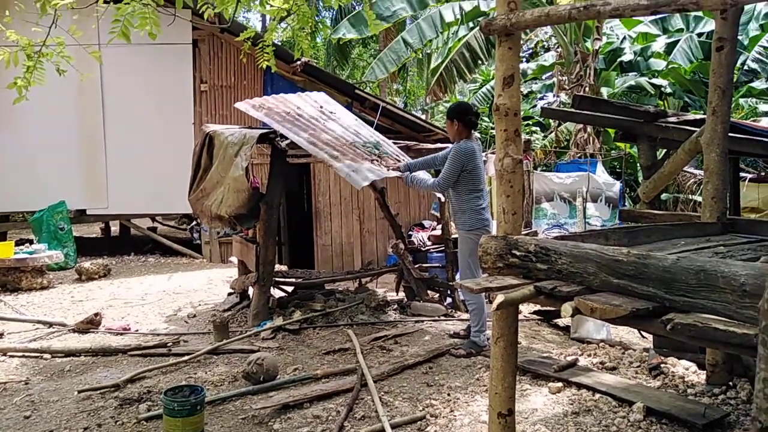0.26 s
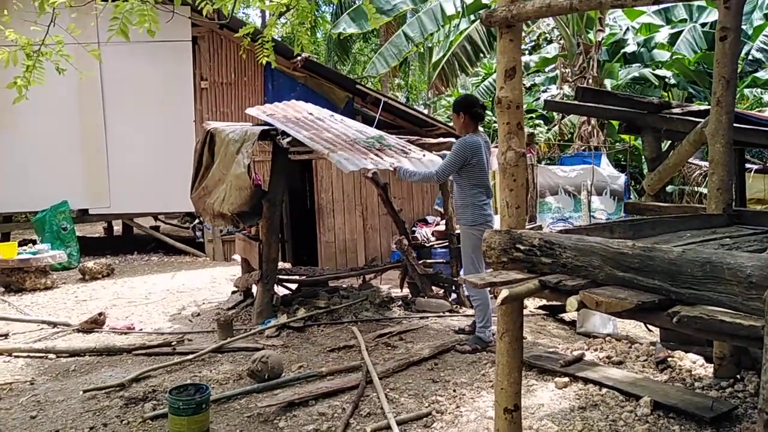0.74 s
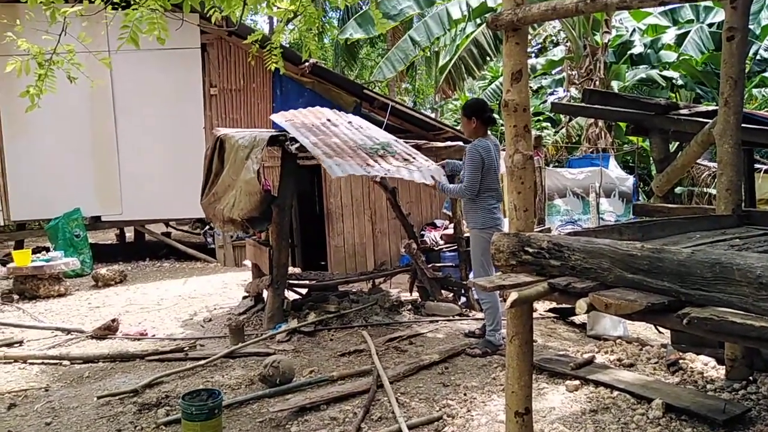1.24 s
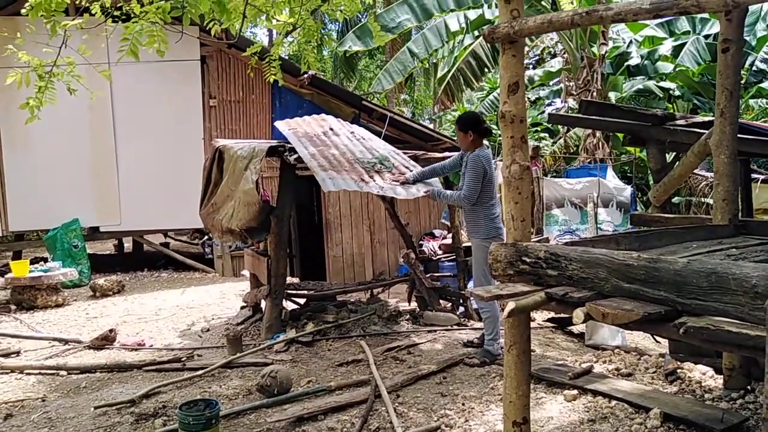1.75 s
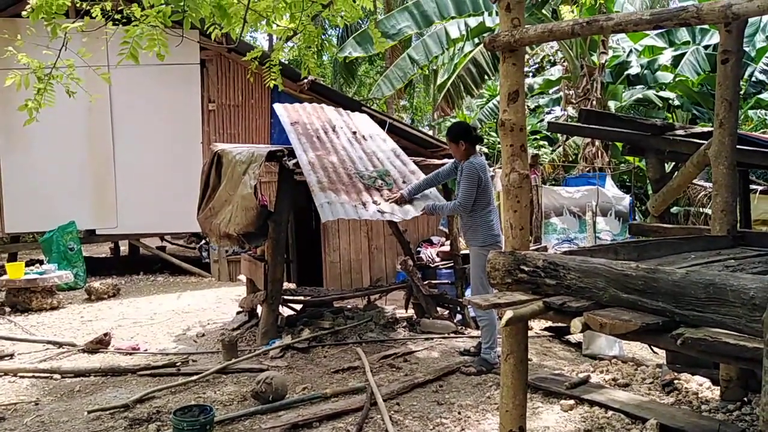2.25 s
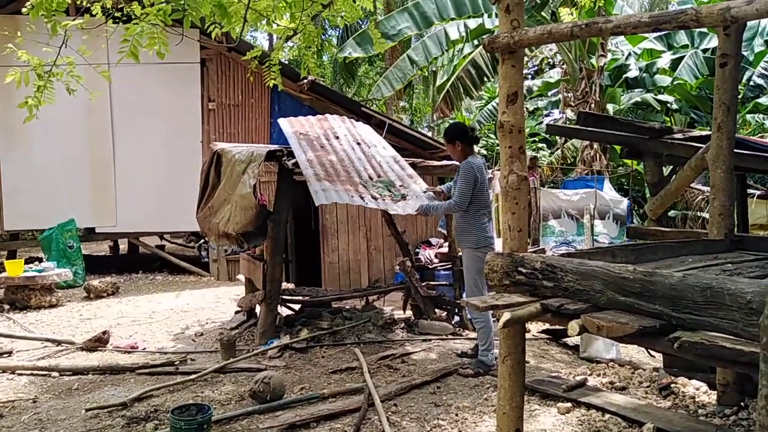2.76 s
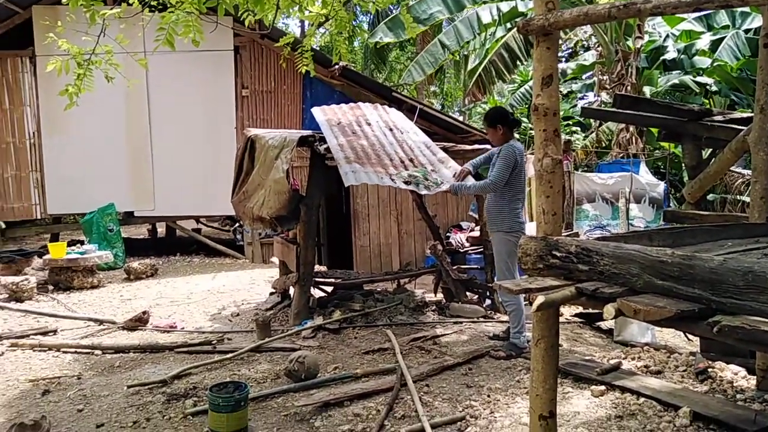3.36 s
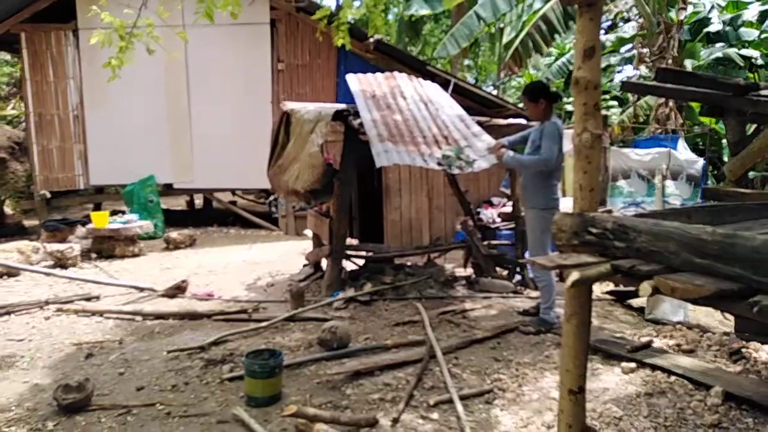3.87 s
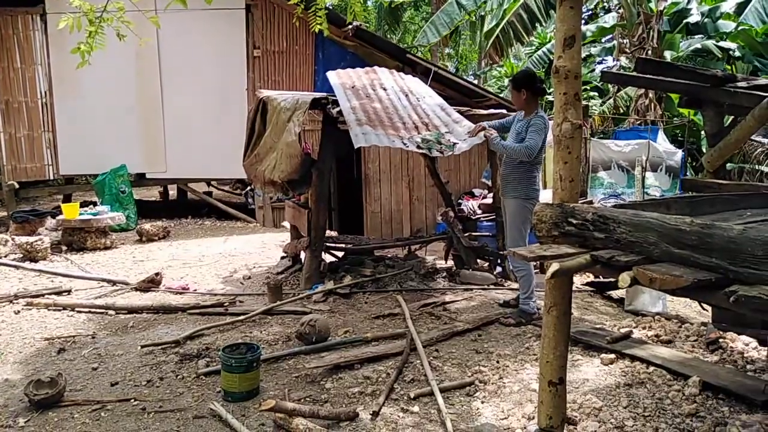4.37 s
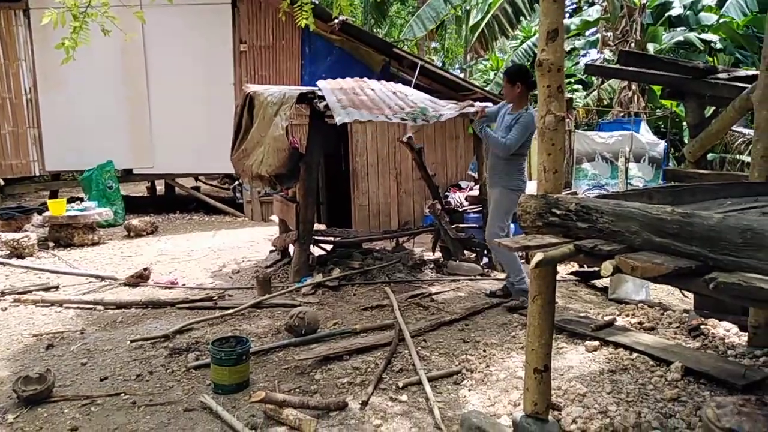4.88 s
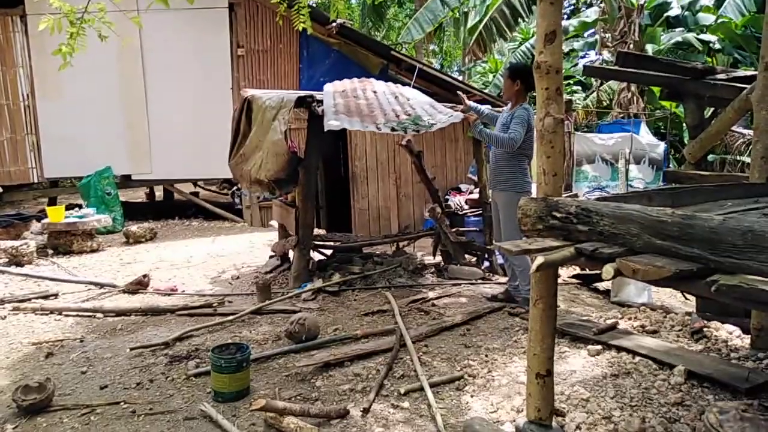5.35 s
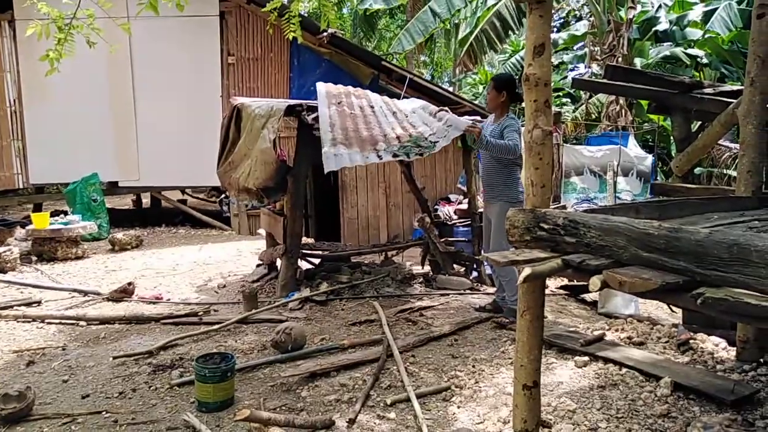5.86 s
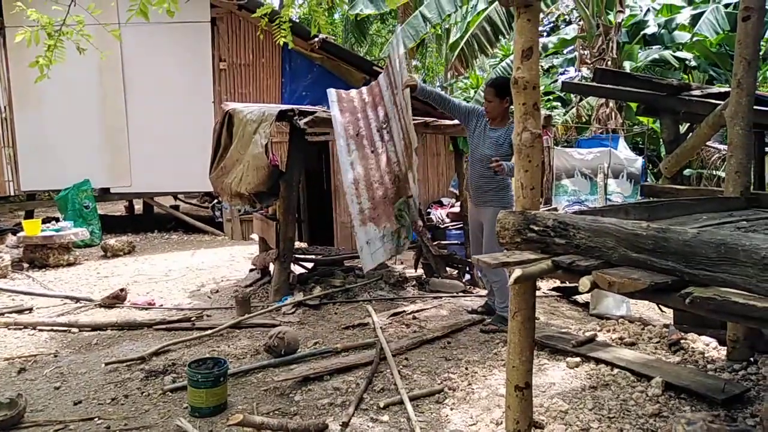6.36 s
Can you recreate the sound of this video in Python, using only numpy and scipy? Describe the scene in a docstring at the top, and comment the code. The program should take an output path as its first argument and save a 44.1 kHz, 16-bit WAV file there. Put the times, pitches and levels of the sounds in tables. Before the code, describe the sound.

Loud bursts of thin ribbed metal scraping, flapping and crashing, separated by quieter lulls with faint distant motors, ending in a hard clattering pull.

```python
"""A rusty corrugated sheet is dragged off a low roof, outdoors, a few metres away.
From the start it grates over the rafters and sheds hissing rust (random slips ring the sheet, grit is
filtered noise), while two small engines run far off (filtered firing pulses). At once it also slaps and
buckles in bright crashes (noise modes, the high ones dying first). From 0.9 s sticks knock under it
(cracks through a resonance) and an edge squeaks once on a nail (an unsteady tone). Big crashes and a hard pull end it."""
import sys
import numpy as np
from scipy import signal
from scipy.fft import rfft, irfft
from scipy.io import wavfile
from scipy.ndimage import uniform_filter1d

SR = 44100
rng = np.random.default_rng(int(sys.argv[2]) if len(sys.argv) > 2 else 0)


def digitize_waveform(pressure):
    """Quantize a signal to 16-bit integers and store it at the path in sys.argv[1].

    Rows of a 2-D input are taken as channels; values are limited to [-1, 1].
    """
    field = np.atleast_2d(pressure).T
    bounded = np.clip(field, -1, 1)
    quanta = np.round(bounded * 32767).astype(np.int16)
    wavfile.write(sys.argv[1], SR, quanta)


N = 291744
TIME = np.arange(N) / SR


def amp(db):
    """Decibels to gain."""
    return 10 ** (np.asarray(db) / 20)


def to_db(power):
    """Power to decibels, safe for silence."""
    return 10 * np.log10(abs(power) + 1e-12)


def read(points, hz):
    """A table read on a log-frequency axis."""
    f, value = np.transpose(points)
    return np.interp(np.log(hz + 1), np.log(f + 1), value)


def follow(rows):
    """The columns of a curve table, sample by sample."""
    s, *columns = np.transpose(rows)
    return [np.interp(TIME, s, c) for c in columns]


def evened(x):
    """Scales to rms 1."""
    return x / np.sqrt(np.mean(x ** 2) + 1e-20)


def smooth_noise(count, width):
    """Slow random drift of rms 1: noise averaged over a width in samples."""
    return evened(uniform_filter1d(rng.standard_normal(count), width))


def add(mix, s, sound):
    """Mixes a stereo sound in at time s."""
    part = mix[:, max(round(s * SR), 0):][:, :sound.shape[1]]
    part += sound[:, :part.shape[1]]


def colour(x, points, size=4096):
    """Causal (minimum-phase) filter with the given spectrum."""
    log_gain = np.log(amp(read(points, abs(np.fft.fftfreq(size, 1 / SR)))))
    taps = np.fft.ifft(np.exp(signal.hilbert(log_gain).conj())).real
    return signal.oaconvolve(x, taps[None], axes=1)[:, :x.shape[1]]


# how alike the two microphones hear each pitch: freq_hz, likeness (0-1)
MIC_LIKENESS = [(50, 1), (350, .94), (1100, 0.85), (1700, 0.69), (2250, 0.37), (2600, 0.72), (3300, 0.18),
                (5000, .03), (14000, 0.04)]


def pair(z, hz):
    """Two unrelated spectra become what two close microphones hear."""
    same = np.clip(read(MIC_LIKENESS, hz), -1, 1)
    return np.array([z[0], same * z[0] + np.sqrt(1 - same ** 2) * z[1]])


# how long the sheet rings: freq_hz, t60_s
RING_TIMES = [(100, 0.78), (400, 0.89), (1200, 0.69), (3500, 0.33), (7500, 0.29), (13000, 0.26)]


def ring(treble_db, bass_db, chatter_s=0, uneven_db=1.8, bass_hz=1000, body_hz=1900, bright_hz=6500,
         size=512, count=320):
    """One blow on the sheet: countless close modes, the high ones dying first."""
    hz = np.fft.rfftfreq(size, 1 / SR)
    t = np.arange(count)[:, None] * size / 4 / SR
    shape = (2, count, len(hz))
    z = pair(rng.standard_normal(shape) + 1j * rng.standard_normal(shape), hz)
    spot = rng.standard_normal(len(hz))  # each spot favours other modes
    tilt_db = read([(bass_hz, bass_db), (body_hz, 0), (bright_hz, treble_db)], hz)
    fade_db = 60 * np.maximum(t - chatter_s, 0) / read(RING_TIMES, hz)
    z *= amp(tilt_db + uneven_db * spot - fade_db)
    blow = signal.istft(z, nperseg=size, noverlap=size * 3 // 4, time_axis=1, freq_axis=2)[1]
    return blow / np.sqrt(size)


# how the sheet radiates, weak below 750 Hz because of its ribs: freq_hz, gain_db
SHEET_SPECTRUM = [(40, -31.5), (150, -12), (300, -4.5), (440, -6), (560, -12), (690, -12.5), (800, -1),
                  (1080, 1.5), (1500, 0), (2200, 1.5), (2650, 1.5), (3600, 1), (5200, 1), (14000, -2)]
# single modes set apart from the dense ring: freq_hz, width_hz, gain_db
SHEET_MODES = [(909, 7.7, 6), (1200, 13, -1.5), (1494, 34, 3.5), (1720, 13, 3.5), (1955, 28, 1),
               (2680, 36, 4.5), (3000, 18, 2.5), (5000, 210, 3)]


def radiate(x):
    """The ribbed sheet's spectrum and its distinct modes."""
    x = colour(x, SHEET_SPECTRUM)
    for hz, width, db in SHEET_MODES:
        mode = signal.lfilter(*signal.iirpeak(hz, hz / width, SR), x)
        x = x + (amp(db) - 1) * mode
    return x


# pulls that slide the sheet over the rafters: start_s, length_s, grating_db (metal on wood), hiss_db (rust);
# both levels are before the sag within a pull and the trims in drag()
RAFTER_PULLS = [(-.08, 0.074, -29.5, -38), (0.133, 0.56, -24, -27.5), (0.735, 0.14, -34, -33),
                (1.002, 0.47, -43, -38.5), (1.647, 0.15, -42, -41.5), (1.838, 0.12, -39, -29),
                (2.15, 0.6, -29.5, -27.5), (2.695, 0.52, -33, -29.5), (3.444, 0.26, -40, -34),
                (3.823, 0.21, -59.5, -49), (4.19, 0.54, -75, -53), (4.904, 0.28, -66.5, -45),
                (5.296, 0.57, -53.5, -41), (5.65, 0.35, -54, -40), (6.12, 0.46, -20, -18.5)]
# steady faint background under the pulls, mostly airy hiss, before the same trims: grating_db, hiss_db
BACKGROUND_LEVELS = (-70, -54.5)


def pulling(rise_s=.08, grate_sag_db_per_s=11.5, hiss_sag_db_per_s=6, stop_db_per_s=82):
    """Levels in dB of grating and hiss: each pull takes hold, eases off and slides to rest."""
    power = amp(BACKGROUND_LEVELS)[:, None] ** 2 * np.ones(N)
    for start, length, grate_db, hiss_db in RAFTER_PULLS:
        t = np.maximum(TIME - start, 0)
        slide = np.minimum(t / rise_s, 1) * amp(-stop_db_per_s * np.maximum(t - length, 0))
        easing_db = [grate_db - grate_sag_db_per_s * t, hiss_db - hiss_sag_db_per_s * t]
        power += (slide * amp(easing_db)) ** 2
    return to_db(power)


def grains(per_s, spread_db):
    """Random tiny slips, a few of them large."""
    size = amp(spread_db * np.minimum(rng.exponential(1, (2, N)), 4))
    return size * rng.choice([-1, 1], (2, N)) * (rng.random((2, N)) < per_s / SR)


# the band of the rust: freq_hz, gain_db
RUST_BAND = [(600, -30), (1500, -6.5), (3000, -5), (4200, -6.5), (6300, -3.5), (7600, -5), (10000, -3),
             (14000, -2.5)]


def drag(grate_trim_db=1, grate_treble_db=-14, grate_bass_db=4.5, grit_db=-10, catch_db=0.8,
         screech_hz=5200, screech_db=-9, press=2.3, firm_db=-28):
    """Slips on the rafters keep the sheet ringing; rust flakes hiss, and screech when pressed hard."""
    grating_db, hissing_db = pulling()
    metal = np.zeros((1, N))
    for _ in range(8):  # eight contact spots, each with its own ring
        slips = grains(150, 3.25)[:1]
        metal = metal + signal.oaconvolve(slips, ring(grate_treble_db, grate_bass_db), axes=1)[:, :N]
    grit = evened(grains(6000, 3.0)) + amp(grit_db) * evened(grains(200, 9.2))
    catching_db = catch_db * smooth_noise(N, 1200)  # the edge catches and frees
    screech = evened(signal.lfilter(*signal.iirpeak(screech_hz, 5, SR), grit))
    # below the firm level the screech falls faster than the hiss
    screech_gain = amp(screech_db + press * np.minimum(hissing_db - firm_db, 0))
    rust = evened(colour(grit, RUST_BAND)) + screech_gain * screech
    return amp(grating_db + grate_trim_db) * evened(radiate(metal)) + amp(hissing_db + catching_db) * rust


def firings(rate, rough):
    """One click per firing, of uneven strength."""
    clicks = np.diff(np.floor(np.cumsum(rate) / SR), prepend=0)
    return clicks * (1 + rough * rng.standard_normal(N))


# far engine, under load and then dropping to idle: time_s, rate_firings_per_s, thump_db, drone_db
FAR_ENGINE = [(0, 20, -55.5, -66.5), (2.0, 16.8, -60, -56), (2.87, 17.9, -56, -54), (3.15, 14.3, -57, -72),
              (6.62, 16.5, -59, -76)]
# spectrum of its thump: freq_hz, gain_db
THUMP_SPECTRUM = [(25, -18), (45, -24), (62, -3), (100, 0.5), (150, -11), (260, -25), (500, -70.5)]


def engine(rough=0.19, scatter_db=-5):
    """A far single cylinder: a thump each firing and a drone at four times the firing rate."""
    rate, thump_db, drone_db = follow(FAR_ENGINE)
    scattered = evened(firings(rate, rough)) + amp(scatter_db) * rng.standard_normal((2, N))
    drone = np.sin(2 * np.pi * 4 * np.cumsum(rate) / SR)
    return amp(drone_db) * evened(drone) - amp(thump_db) * evened(colour(scattered, THUMP_SPECTRUM))


# a second, faster motor farther off: time_s, rate_firings_per_s, level_db
FAR_MOTOR = [(0, 28, -68), (4.1, 31.4, -61), (4.5, 33.8, -57), (5.3, 31, -56.5), (6.62, 30.6, -50)]
# spectrum of its buzz: freq_hz, gain_db
BUZZ_SPECTRUM = [(70, -26), (130, -6.5), (220, -1.5), (330, -1.5), (390, -6), (480, -44), (900, -56)]


def motor(rough=0.49, echo_db=-1, echo_s=0.019, scatter_db=-2):
    """Echoes from walls and trees smear the faster motor's firings into a low buzz."""
    rate, level_db = follow(FAR_MOTOR)
    pulses = evened(firings(rate, rough))
    t = np.arange(SR // 8) / SR
    echo_tail = rng.standard_normal(len(t)) * np.exp(-t / echo_s)
    echoes = evened(signal.oaconvolve(pulses, echo_tail)[:N])
    smeared = amp(echo_db) * echoes - pulses + amp(scatter_db) * rng.standard_normal((2, N))
    return amp(level_db) * evened(colour(smeared, BUZZ_SPECTRUM))


# the sheet slaps the frame: start_s, body_db, treble_db (over body); levels before the trims in buckles()
FRAME_SLAPS = [(.035, -32.5, -1.5), (.101, -26, 10.5), (.28, -26, 7), (.376, -25.5, 10), (.473, -23, 2),
               (.533, -26.5, 6.5), (.78, -31.5, -5.5), (1.353, -33, -1.5), (1.555, -44, 2.5),
               (1.774, -22.5, -3), (1.813, -23.5, 5), (1.844, -17.5, 2.5), (1.899, -19, 3),
               (1.926, -19.5, 7), (2.018, -22.5, 6), (2.1158, -12.5, -1), (3.245, -25.5, -6),
               (3.341, -15.5, 10), (3.411, -18.5, 6), (4.181, -37, -12), (4.376, -48, -30),
               (4.675, -58, -20), (4.976, -42, -4.5), (5.27, -47.5, -16), (5.509, -41.5, -16),
               (5.847, -18, 10.5), (5.986, -23, -0.5), (6.049, -21, 3.5), (6.0936, -15.5, 6.5)]
# the sheet buckles, rib after rib: start_s, body_db, treble_db (over body), length_s; same trims
RIB_BUCKLES = [(0.129, -17, 10, .028), (0.192, -17.5, 2, .021), (0.394, -17.5, -24, .012),
               (0.706, -36.5, 5.5, 0.0079), (1.724, -30, -15, 0.026), (1.944, -20, 5, .009),
               (2.136, -16, 5.5, .012), (2.175, -14.5, 5.5, .018), (2.226, -18, -.5, .009),
               (3.32, -25.5, -9.5, 0.025), (6.149, -13, 4.5, .018), (6.31, -15, 1, .017),
               (6.415, -18, -12, .011)]


def blows(slap_rise_s=0.0014, slap_hold_s=0.012, dull_db=25, swell=.7):
    """Slaps and buckles as (s, body dB, treble dB, rise s, chatter s); brighter slaps start sharper."""
    found = []
    for s, db, bright_db in FRAME_SLAPS:
        rise_s = slap_rise_s * 2 ** (-bright_db / dull_db)  # dull_db less treble doubles the rise
        found.append((s, db, bright_db, rise_s, slap_hold_s))
    for s, db, bright_db, length in RIB_BUCKLES:
        found.append((s, db, bright_db, swell * length, length))  # builds up over a share of its length
    return found


def buckles(level_trim_db=14, treble_trim_db=-5, snap=0.15, snap_s=0.0013, rattle=0.059,
            bass_db=-1, bass_per_db=-0.005, medium_db=-20.5):
    """Each blow snaps or swells, chatters against the frame and rings out in the sheet."""
    out = np.zeros((2, N))
    for s, db, bright_db, rise_s, chatter_s in blows():
        lean_db = bass_db + bass_per_db * (db - medium_db)  # harder blows have less bass
        blow = ring(bright_db + treble_trim_db, lean_db, chatter_s)
        t = np.arange(blow.shape[1]) / SR
        onset = np.minimum(t / rise_s, 1) * (1 + snap * np.exp(-t / snap_s))
        add(out, s, amp(db + level_trim_db) * blow * onset)
    contact = smooth_noise(N, 100)  # loose edges touch and part
    return radiate(out * np.exp(rattle * contact))


def saturate_bass(x, knee_db=-47, give=0.38, bass_hz=560):
    """The long, low modes stiffen as they swing, so they grow less than the rest in a crash."""
    hz = np.fft.rfftfreq(N, 1 / SR)
    bass = irfft(rfft(x) / (1 + (hz / bass_hz) ** 8), N)
    swing_db = to_db(uniform_filter1d((bass ** 2).mean(0), 2000))
    return x + bass * (amp(-give * np.maximum(swing_db - knee_db, 0)) - 1)


def flex(x, depth_db, size=2048):
    """As the sheet bends, narrow resonances swell and fade all over its spectrum."""
    z = signal.stft(x, nperseg=size)[2]
    drift = uniform_filter1d(rng.standard_normal(z.shape[:0:-1]), 12, axis=0)  # along time
    for _ in range(2):
        drift = uniform_filter1d(drift, 3, axis=1)  # along frequency
    gain = evened(amp(depth_db * evened(drift)))
    # minimum phase: resonances only ring after the blow
    response = signal.hilbert(np.log(np.hstack([gain, gain[:, -2:0:-1]]))).conj()
    return signal.istft(z * np.exp(response[:, :gain.shape[1]]).T, nperseg=size)[1][:, :N]


# dry knocks and ticks of the wooden frame: start_s, level_db (before trim and pitch scaling), pitch_hz, t60_s
FRAME_KNOCKS = [(.896, -30, 3400, 0.025), (1.2072, -18, 2700, 0.024), (1.24, -35.5, 296, 0.038),
                (1.461, -27, 1700, 0.039), (1.745, -30.5, 4460, .025), (1.778, -18.5, 4900, 0.027),
                (2.807, -36, 334, 0.057), (4.4457, -47, 8190, .05), (4.643, -51, 10800, 0.049),
                (4.98, -37.5, 3000, 0.11), (6.416, -26, 1710, 0.016)]


def knocks(level_trim_db=4.0, crack=5, yard_db=-24, yard_t60_s=1.0, skirt_db=-21):
    """A sharp woody crack and a short ring, with a faint answer from the yard."""
    out = np.zeros((2, N))
    t = np.arange(SR // 3) / SR
    for s, db, hz, t60 in FRAME_KNOCKS:
        spectrum = rfft(rng.standard_normal((2, len(t))))
        noise = irfft(pair(spectrum, np.fft.rfftfreq(len(t), 1 / SR)))
        decay = amp(-60 * t / t60) + amp(yard_db - 60 * t / yard_t60_s)
        blow = crack * (t == 0) + noise * decay
        resonance = [(hz / 6, skirt_db), (hz * 0.69, -2), (hz * 1.16, 0), (hz * 2.44, skirt_db), (hz * 5, -45)]
        # the square root offsets the narrower band of low knocks
        add(out, s, amp(db + level_trim_db) * np.sqrt(SR / 2 / hz) * colour(blow, resonance))
    return out


# an edge squeaks on a nail: start_s, level_db, pitch_hz (mid-glide), length_s (before the tail)
NAIL_SQUEAKS = [(0.989, -33.5, 1920, 0.019)]


def squeaks(glide=0.04, jitter=0.048, tail_db=-13, tail_t60_s=0.3):
    """A brief, unsteady, slightly falling stick-slip tone that lingers in the sheet."""
    out = np.zeros((2, N))
    t = np.arange(SR // 8) / SR
    for s, db, hz, length in NAIL_SQUEAKS:
        u = np.minimum(t / length, 1)
        slip = jitter * smooth_noise(len(t), 60)
        tone = np.sin(2 * np.pi * np.cumsum(hz * (1 + glide * (.5 - u) + slip)) / SR)
        swell = np.sqrt(abs(np.sin(np.pi * u)))
        tail = u * amp(tail_db - 60 * t / tail_t60_s)
        add(out, s, amp(db) * np.ones((2, 1)) * tone * (swell + tail))
    return out


def scene():
    """The sheet, the frame under it and the far engines."""
    sheet = flex(saturate_bass(buckles() + drag()), depth_db=1.68)
    return sheet + knocks() + squeaks() + engine() + motor()


# colour of the microphone pair: freq_hz, gain_db
MIC_COLOUR = [(4000, 1), (6400, 3), (7600, 6.5), (8300, 1.5), (9300, -3), (11300, -6), (12500, -7.5),
              (14200, -12)]
# left over right: freq_hz, difference_db
LEFT_OVER_RIGHT = [(400, -1), (900, 1), (2000, 2.5), (2600, 1.8), (3200, 4.5), (5400, 6.5), (6200, -0.5),
                   (6700, -2), (7600, -9.5), (8800, -6.5), (10000, 0), (12000, 4.5)]


def record(dry, limit_db=-10, squeeze=0.27, recovery_db_per_s=90, ceiling=0.94, edge_hz=14300):
    """Microphone colour, a limiter on the crashes, clipping and the band limit."""
    hz = np.fft.rfftfreq(N, 1 / SR)
    side_gain = amp(read(LEFT_OVER_RIGHT, hz) * np.array([[.5], [-.5]]))
    x = irfft(rfft(colour(dry, MIC_COLOUR)) * side_gain, N)
    power_db = to_db(uniform_filter1d((x ** 2).mean(0), 200))
    recovery_db = TIME * recovery_db_per_s
    held_db = np.maximum.accumulate(power_db + recovery_db) - recovery_db  # peaks held, then released
    over_db = np.maximum(held_db - limit_db, 0)
    x = np.clip(x * amp(-squeeze * uniform_filter1d(over_db, 100)), -ceiling, ceiling)
    lowpass = signal.firwin(511, edge_hz, window=("kaiser", 8), fs=SR)
    return signal.oaconvolve(x, lowpass[None], "same", axes=1)


dry = scene()
out = record(dry)
digitize_waveform(out)
```